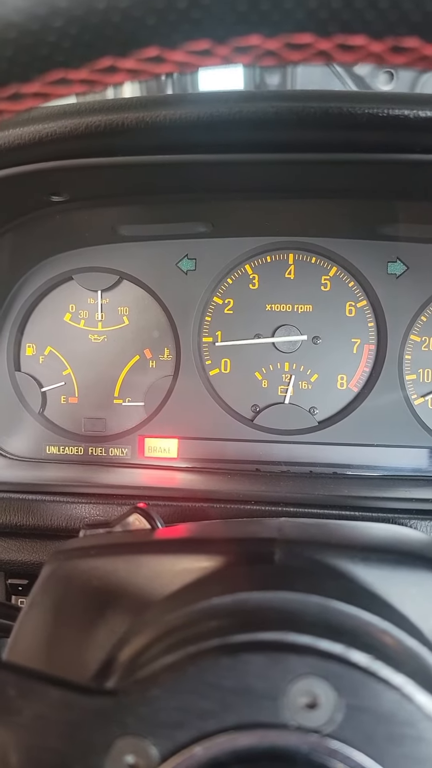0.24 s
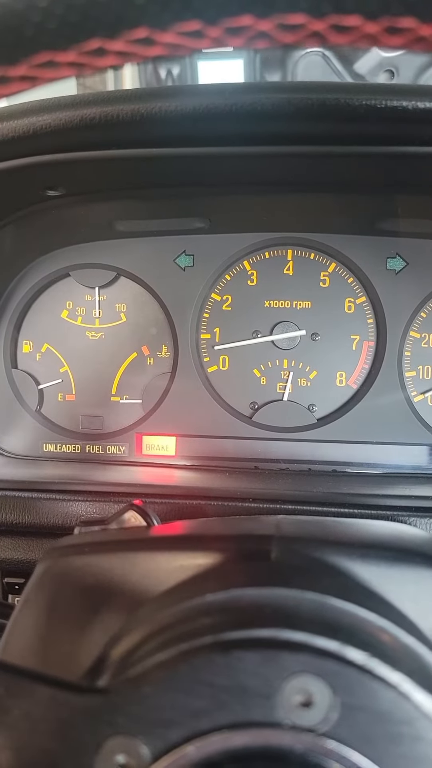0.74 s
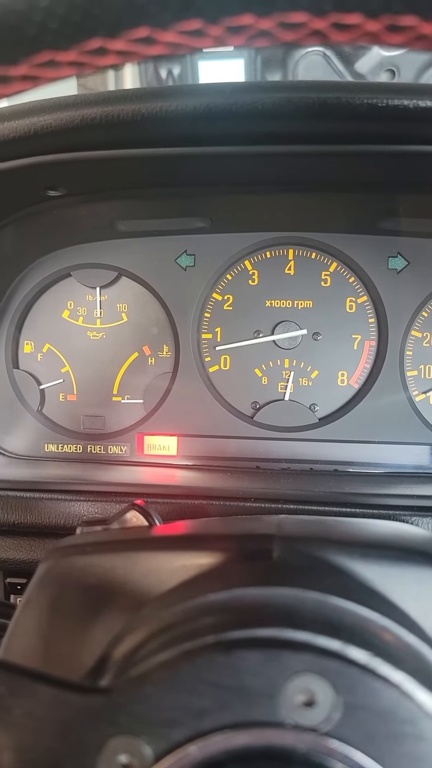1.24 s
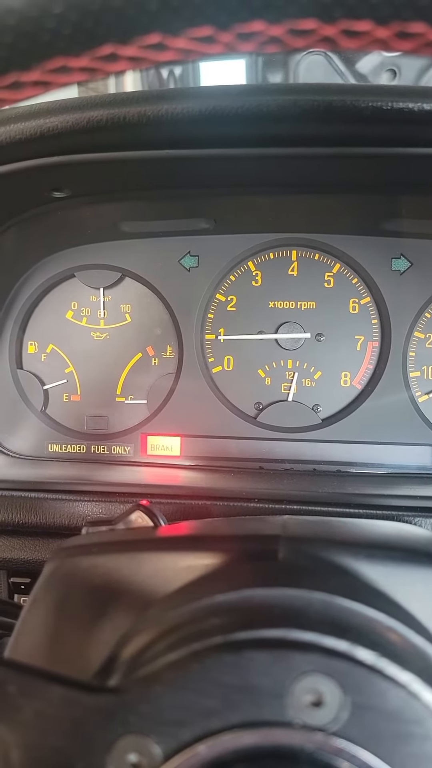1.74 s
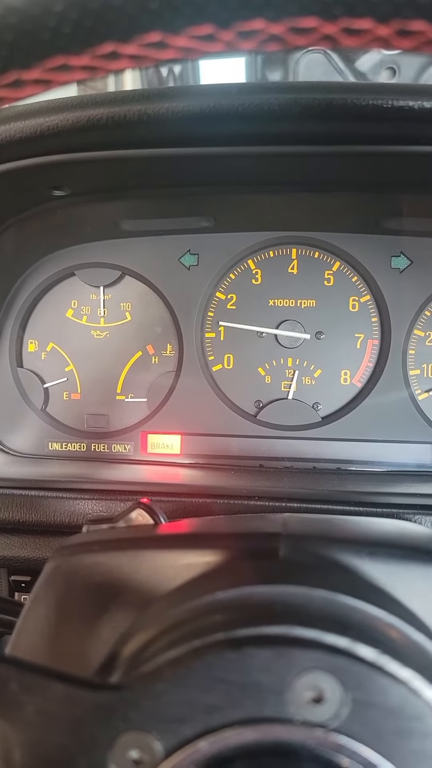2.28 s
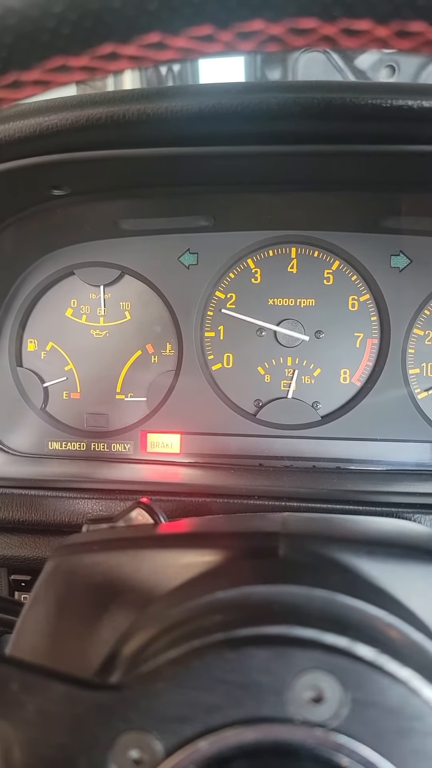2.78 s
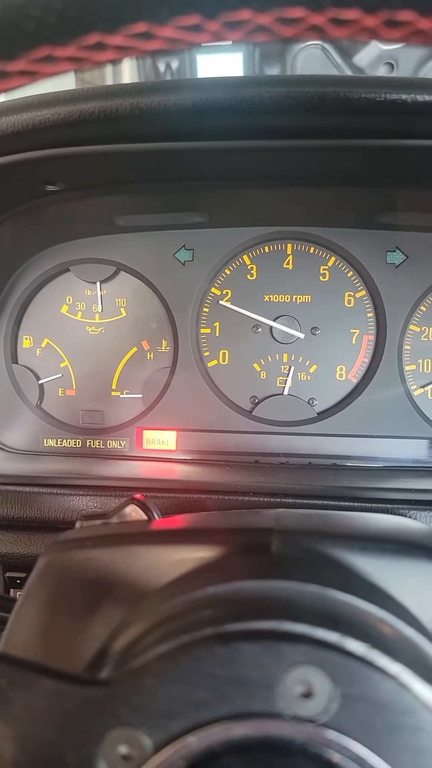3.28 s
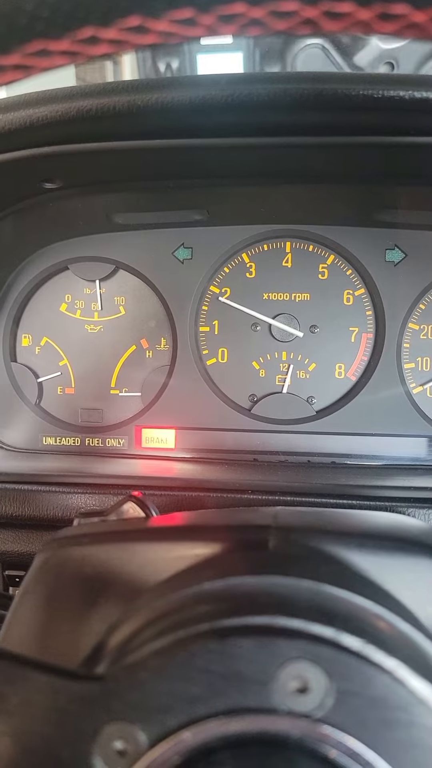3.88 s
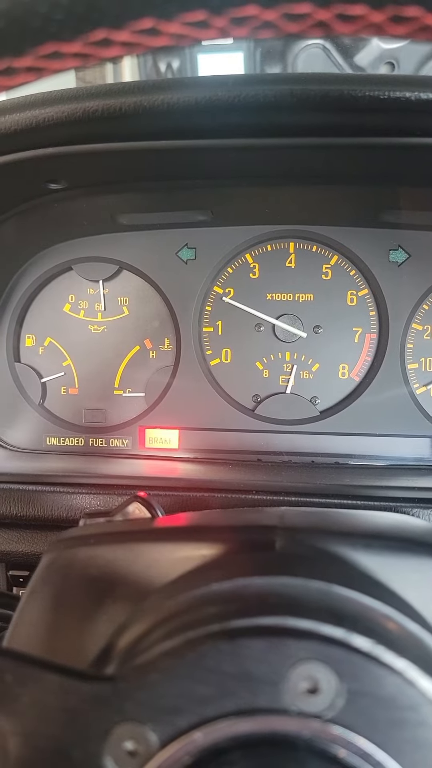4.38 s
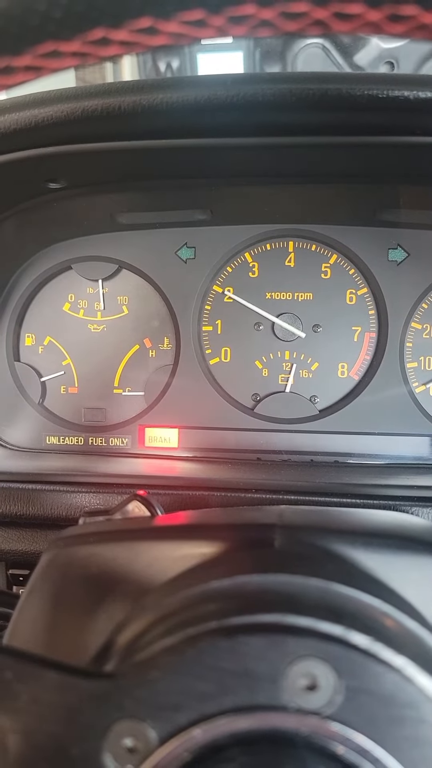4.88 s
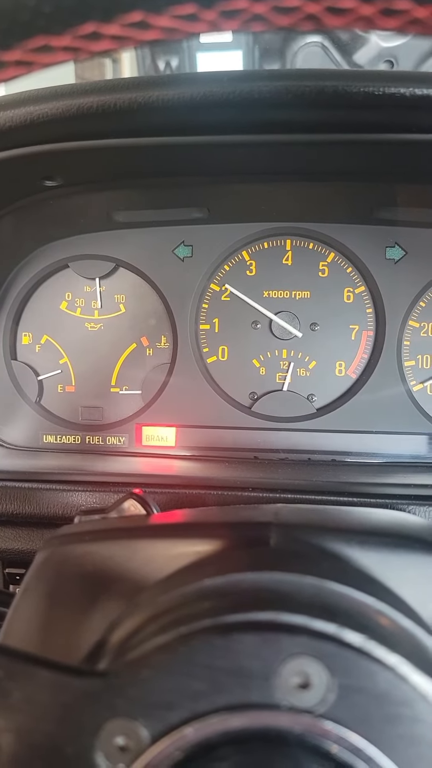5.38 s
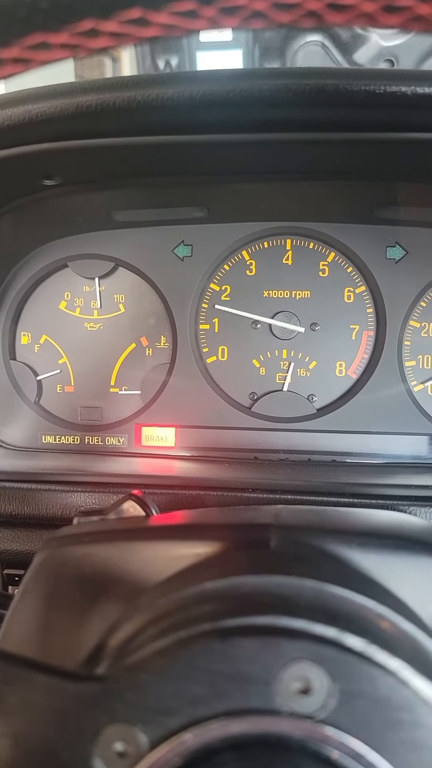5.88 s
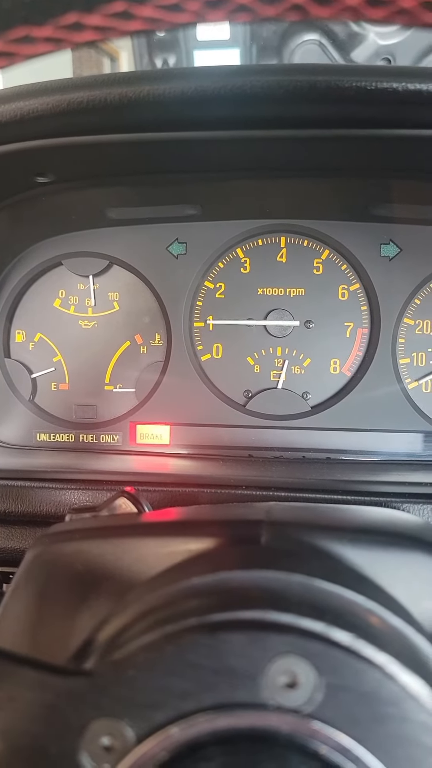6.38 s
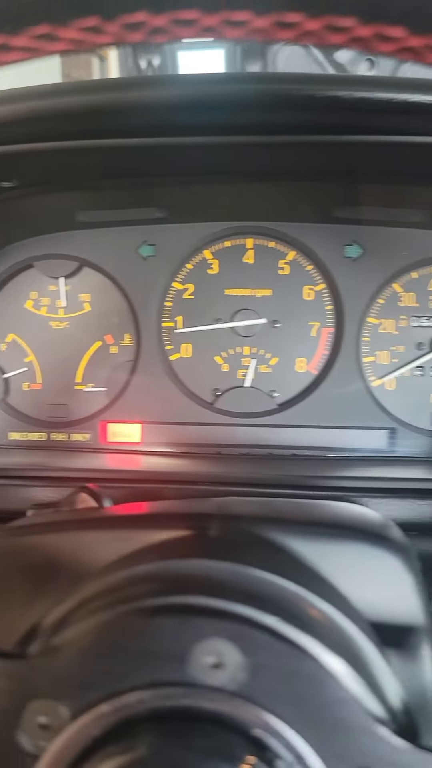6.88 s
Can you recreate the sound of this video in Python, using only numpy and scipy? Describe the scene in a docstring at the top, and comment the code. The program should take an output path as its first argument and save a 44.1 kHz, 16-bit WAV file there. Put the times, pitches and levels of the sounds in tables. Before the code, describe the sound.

From the driver's seat of a stationary car, a cold rotary engine is heard through a phone's stereo microphones. From 0 to 0.5 s the revs sag; until 1.4 s it idles low and lumpy, about 23 soft thuds a second, with a steady thin whine near 2 kHz, belt and fan murmur, and small metallic ticks and spits, sharpest near 1.45 s. At 1.5 s the throttle pushes: a plastic trim panel buzzes briefly, hiss jumps up, and thuds merge into a rising growl. From 2.3 to 4.5 s it holds a rough, booming drone with rushing gas and a faint fan tone. At 4.6 s it climbs again, peaking around 5.3 s, about a third higher. Then it drops fast, stumbling unevenly, with muffled pops around 5.8-6 s. Hiss fades, and slowing thuds and whine return until 7.1 s.

```python
"""A cold two-rotor engine heard from the driver's seat: lumpy idle, a push, a hold, then 2300 rpm and a stumbling fall.
At idle the firings part into thuds, under an intake whine, a murmur of belts and fan, and rings and spits of thin metal.
As the revs climb, each firing rings cabin, pipe and silencer, so harmonics boom and drone as they sweep through them.
Gas roars with speed and hisses with load; a trim panel buzzes on the way up and a fan tone joins in.
On the way down one rotor fires weakly, late burns thump and pop, and the thuds return."""
import sys
import numpy as np
from scipy import signal
from scipy.fft import rfft, irfft
from scipy.io import wavfile
from scipy.ndimage import uniform_filter1d

SR = 44100
rng = np.random.default_rng(int(sys.argv[2]) if len(sys.argv) > 2 else 0)


def wrap_up_sound(samples):
    """Save the sound to the file named by the first command line argument, as 16-bit audio."""
    columns = np.atleast_2d(samples).T
    # keep every value between -1 and 1, then stretch to whole-number steps
    tamed = np.clip(columns, -1, 1)
    steps = np.round(tamed * 32767).astype(np.int16)
    wavfile.write(sys.argv[1], SR, steps)


N = 314433
TIME = np.arange(N) / SR
FREQ = np.fft.rfftfreq(N, 1 / SR) + 1e-3
CRUISE_HZ = 60  # firings per second at cruising speed; octaves of speed count from here

# pieces of thin metal that gas and firings ring: pitch_hz [Hz], level_db [dB, relative]
METAL = [(4860, 4.5), (5700, 5.5), (6380, -1), (7110, 5.5), (7650, -4), (8500, 1), (9160, 0.5), (12300, -4),
         (14605, -10)]
# spectrum of hissing gas: freq_hz [Hz], density_db [dB per Hz, relative]
HISS_COLOUR = [(2060, -11.5), (3500, -4.5), (4560, -4.5), (7670, -1), (9800, -9), (10900, -7),
               (12500, -1.5), (15000, -2), (15700, -5)]


def undb(db):
    """Decibels to gain."""
    return 10 ** (np.asarray(db) / 20)


def curves(table):
    """The columns of a table, joined by straight lines in time."""
    s, *columns = np.transpose(table)
    return [np.interp(TIME, s, c) for c in columns]


def unit(x):
    """Scale to rms 1."""
    return x / np.sqrt(np.mean(x ** 2))


def steady(x, size=6001):
    """Level slow swells to rms 1 over a window of size samples; single firings keep their sizes."""
    power = np.mean(np.atleast_2d(x) ** 2, axis=0)
    power = uniform_filter1d(uniform_filter1d(power, size), size // 2)
    return x / np.sqrt(np.abs(power) + 1e-18)


def filtered(x, response):
    """Pass a sound through a frequency response."""
    return irfft(rfft(x) * response, N)


def colour(points):
    """Response through (Hz, dB) points, straight in log frequency."""
    hz, db = np.transpose(points)
    return undb(np.interp(np.log(FREQ), np.log(hz), db))


def resonance(x):
    """Steep-sided resonance: about 12 dB down at x = 1 off its centre."""
    return 1 / ((1 + 1j * x) * (1 + x ** 2) ** (3 / 2))


def modes(table, first_ms=0, step_ms=0):
    """Response of a set of resonances; delays that differ from one to the next smear a thump into a burble."""
    hz, width, db = np.transpose(table)[:, :, None]
    lag_s = (first_ms + step_ms * np.arange(len(table))[:, None]) / 1000
    ring = undb(db) * resonance((FREQ ** 2 - hz ** 2) / (FREQ * width * 2.1))
    return np.sum(ring * np.exp(-2j * np.pi * FREQ * lag_s), axis=0)


def moving_mode(x, hz, width):
    """One resonance whose centre follows a curve: shift the sound to 0 Hz, filter it, shift it back."""
    spin = np.exp(2j * np.pi * np.cumsum(hz) / SR)
    response = resonance(np.fft.fftfreq(N, 1 / SR) / width)
    return 2 * np.real(spin * np.fft.ifft(np.fft.fft(x / spin) * response))


def noise():
    """Unrelated noise at the two microphones."""
    return rng.standard_normal((2, N))


def walk(rate_hz):
    """Smooth chance with spread 1, slower than about rate_hz."""
    return unit(filtered(rng.standard_normal(N), 1 / (1 + (FREQ / rate_hz) ** 4)))


def place(x, pan_db, lead_ms=0):
    """Left is louder by pan_db and earlier by lead_ms."""
    side = np.array([[1], [-1]]) / 2
    return filtered(x, undb(side * pan_db) * np.exp(2j * np.pi * FREQ * side * lead_ms / 1000))


def swell(decay_s, rise_s):
    """A quarter-second envelope that rises to 1 and dies away."""
    age = TIME[:SR // 4]
    shape = np.exp(-age / decay_s) * (1 - np.exp(-age / rise_s))
    return shape / shape.max()


def kicks(s, db):
    """Single pulses at given times and levels."""
    return np.bincount((s * SR).astype(int), undb(db), N)[:N]


def puffs(pulses, decay_s, rise_s):
    """Flow that swells and dies away after each pulse."""
    return unit(signal.fftconvolve(pulses, swell(decay_s, rise_s))[:N])


def pings(s, db, hz):
    """Brief, rough rings of thin metal: tones shivered by chance, differently at each microphone."""
    width_hz = 55
    out, shape = np.zeros((2, N + SR)), swell(decay_s=.018, rise_s=.005)
    shiver = np.array([walk(width_hz) + 1j * walk(width_hz) for _ in range(2)])
    for start, gain, f in zip((s * SR).astype(int), undb(db), hz):
        at = start + np.arange(len(shape))
        ring = np.real(shiver[:, at % N] * np.exp(2j * np.pi * f * at / SR))
        out[:, at] += gain * shape * ring
    return out[:, :N]


def roughness(octaves, climb):
    """Uneven combustion: firings scatter more at speed, and more again while the revs fall."""
    cruising, per_octave, falling = 0.18, 0.04, 0.12  # falling: per octave a second of fall
    return cruising + per_octave * octaves + falling * np.maximum(-climb, 0)


def firing_samples(turn):
    """The sample at which each firing is due; turn counts firings."""
    return np.searchsorted(turn, np.arange(1, int(turn[-1])))


def firings(turn, rough, imbalance_db, scatter_db, jitter_ms):
    """One pulse per firing, rotors alternating; imbalance lifts one and lowers the other, roughness scatters both."""
    at = firing_samples(turn)
    late, strength = rng.standard_normal((len(at), 2)).T
    rotor = (-1) ** np.arange(len(at))
    # scatter and jitter are stated for roughness 1
    size = undb(scatter_db * rough[at] * np.minimum(strength, 1.5) + imbalance_db[at] * rotor)
    shift = jitter_ms * rough[at] * late * SR / 1000
    return np.bincount(np.clip(at + shift, 0, N - 1).astype(int), size, N)


def wander(octaves):
    """A cold engine burns unevenly: each exhaust voice swells and sinks a little, most at idle."""
    depth_db, rate_hz = 1.5, 4  # depth at idle
    return undb(depth_db * np.clip(-octaves, .5, 1) * np.clip(walk(rate_hz), -2, 1))


def loudness(law, load, octaves, climb):
    """Gain of an exhaust voice: it follows load, speed and how fast the revs rise or fall."""
    full_db, unloaded_db, octave_db, pulling_db = law
    level_db = full_db - unloaded_db * (1 - load) + octave_db * octaves + pulling_db * np.clip(climb, -1, 1)
    return wander(octaves) * undb(level_db)


def pipe_ring(push, octaves):
    """The pipe's resonances rise with speed as the gas gets hotter; each tilts with speed and has its own delay."""
    # exhaust pipe at cruising speed: pitch_hz [Hz], width_hz [Hz], level_db [dB], gain_db [dB per octave of speed]
    pipe_modes = [(112.7, 30, -11.5, 1), (146.8, 9.2, -1, -2), (192.1, 23.6, -6, 1), (208.6, 22, -2, -1),
                  (239.7, 15.5, -8, 5)]
    rise_per_octave = 0.035  # share of the pitch
    out = 0
    for k, (hz, width, db, octave_db) in enumerate(pipe_modes):
        late = np.roll(push, int((.008 * k - .004) * SR))
        ring = moving_mode(late, hz * (1 + rise_per_octave * octaves), width)
        out = out + ring * undb(db + octave_db * octaves)
    return out


def silencer_drone(push, octaves):
    """The silencer's main resonance climbs with speed as the gas gets hotter; fixed ones drone beside it."""
    # fixed resonances of the silencer: pitch_hz [Hz], width_hz [Hz], level_db [dB]
    drone_modes = [(277.7, 28.6, -6.5), (319.1, 19.9, 1), (365, 30, -18)]
    # fader of the drone: time_s [s], gain_db [dB]
    drone_gain = [(0, -28), (.45, -37), (1.3, -39.5), (2.05, -27.5), (2.3, -19), (2.5, -19), (3.1, -15),
                  (4.2, -11.5), (4.85, -16.5), (5.3, -10.5), (5.5, -24), (6.3, -30), (7.13, -38.5)]
    main_hz = 307.7 + 23.9 * octaves
    tailpipe = np.roll(push, int(.0233 * SR))
    silencer = moving_mode(tailpipe, main_hz, width=35.2)
    fixed_modes = filtered(push, modes(drone_modes, first_ms=10, step_ms=9))
    return (silencer + fixed_modes) * undb(curves(drone_gain)[0])


def exhaust(pulses, rough, load, octaves, climb, lumpy):
    """Firings and their turbulence ring cabin air, pipe and silencer; a voice swells as a harmonic sweeps through."""
    # deep and middle resonances of cabin air and exhaust: pitch_hz [Hz], width_hz [Hz], level_db [dB]
    boom_modes = [(25.7, 9.1, -14), (34.2, 5.3, 8), (45.4, 9, 0)]
    throb_modes = [(66.2, 7.1, 7), (77.7, 7.4, 4), (89.75, 4.4, 11), (99, 4.5, 0.5)]
    # loudness of each voice: level_db [dB at full load and cruising speed], unloaded_loss_db [dB at no load],
    # speed_gain_db [dB per octave of speed], pulling_gain_db [dB per octave a second of climb, up to 1 either way]
    boom_law = (-15, 18, -4.5, -3)
    throb_law = (-19, 9, -6, -1)
    pipe_law = (-13, 2, 6.5, 2)
    # fader of the pipe's ring: time_s [s], gain_db [dB]
    pipe_gain = [(.2, 4), (.65, 4.5), (1.2, -1), (1.7, 2.5), (2.08, -4.5), (2.45, -1.5), (2.8, -2),
                 (3.6, -5.5), (4.5, -2), (5.1, -3), (5.5, -5.5), (5.9, -3), (6.4, -2), (6.75, 5), (7.13, 2)]
    per_harmonic = np.sqrt(SR / (2 * CRUISE_HZ * 2 ** octaves))  # every harmonic has rms 1
    beat = per_harmonic * steady(pulses)
    turbulence = per_harmonic * rough * rng.standard_normal(N)
    boom_swell, throb_swell = thumps()

    boom = filtered(beat + 1.6 * turbulence, modes(boom_modes, first_ms=40))
    boom = boom * boom_swell * loudness(boom_law, load, octaves, climb)
    throb = filtered(beat + .8 * turbulence, modes(throb_modes, first_ms=-7, step_ms=3))
    throb = throb * throb_swell * loudness(throb_law, load, octaves, climb)
    pipe = pipe_ring(beat + 1.8 * turbulence, octaves) * loudness(pipe_law, load, octaves, climb)
    # the long rings give way to the thuds at idle
    boom = boom * undb(-10 * lumpy ** 4)
    throb = throb * undb(-20 * lumpy)
    pipe = pipe * undb(-8 * lumpy + curves(pipe_gain)[0])
    drone = silencer_drone(beat + 0.55 * turbulence, octaves)

    low = place(boom, pan_db=-2.1, lead_ms=1.5) + place(throb, pan_db=-.8, lead_ms=.35)
    return low + place(pipe, pan_db=-.1, lead_ms=.08) + place(drone, pan_db=-2.6, lead_ms=.4)


def thuds(pulses, lumpy):
    """Slow firings and late burns reach the cabin as short, separate thuds, each ringing the same body."""
    # body of one thud: pitch_hz [Hz], width_hz [Hz], level_db [dB]
    thud_modes = [(74, 44, 0), (130, 60, -4), (210, 70, -12), (325, 60, -21)]
    # strength of the thuds, before lumpiness and firing size: time_s [s], peak_db [dB]
    thud_gain = [(0, -19), (.5, -17), (.9, -14), (1.2, -11.5), (1.35, -9.5), (1.5, -7.5), (1.8, -10),
                 (6.2, -20), (6.7, -17), (7.13, -15)]
    # late burns that pop as the revs fall: start_s [s], peak_db [dB]
    pop_hits = [(5.797, -5.5), (5.825, -16), (5.88, -12), (5.972, -14)]
    body = modes(thud_modes, first_ms=2)
    body = -body / np.abs(irfft(body, N)).max()
    uneven_db = 1.5 * np.clip(walk(20), -2, 1.5)
    beats = pulses * lumpy * undb(curves(thud_gain)[0] + uneven_db)
    pops = kicks(*np.transpose(pop_hits))
    return place(filtered(beats + pops, body), pan_db=-.6, lead_ms=.2)


def roar(pulses, roar_db):
    """The sharp edge of each firing scatters round the car, and rushing gas follows it."""
    # spectrum of the roar: freq_hz [Hz], density_db [dB per Hz, relative]
    roar_colour = [(250, -1.5), (390, 8), (440, 0), (510, 5), (625, -4), (700, 1.5), (1020, -2),
                   (1130, -0.5), (1300, -3.5), (1700, -6.5), (2300, -11), (2620, -13.5), (2780, -8.5),
                   (2920, -13.5), (3370, -16), (6000, -25), (8000, -34)]
    scatter = noise()[:, :SR // 8] * np.exp(-TIME[:SR // 8] / .014)
    edge = steady(signal.fftconvolve(pulses[None], scatter)[:, :N])
    rasp = filtered(edge, 1.7 / (1 + (FREQ / 1100) ** 2))
    rush = noise() * (puffs(pulses, decay_s=0.029, rise_s=0.00033) + 2.2)
    gas = steady(filtered(rush + rasp, colour(roar_colour)))
    return place(gas * undb(roar_db), pan_db=-2.5)


def hiss(pulses, hiss_db):
    """Spurts of gas, separate at idle and merging at speed, with thin metal and throttle edge singing along."""
    # faint whistles at the edge of the throttle plate: pitch_hz [Hz], width_hz [Hz], level_db [dB]
    whistle_modes = [(12256, 20, 13), (12634, 35, 0), (15142, 20, 5)]
    # stereo balance of the hiss: freq_hz [Hz], left_minus_right_db [dB]
    hiss_balance = [(60, -1.0), (110, -0.5), (200, 6), (380, 7), (700, -8), (1290, 30), (2380, 22.5),
                    (4400, -7.5), (8120, 1), (15000, 1)]
    spurts = puffs(pulses, decay_s=0.039, rise_s=0.022)
    slack_db = hiss_db.max() - hiss_db  # how far the flow is below its strongest
    air = unit(filtered(noise(), colour(HISS_COLOUR)))
    top = filtered(air, 1 / (1 + (10500 / FREQ) ** 12))
    air = air + top * (undb(4.0 - 0.49 * slack_db) - 1)  # weak flow is duller
    whistle = unit(filtered(noise(), modes(whistle_modes))) * undb(-10 - 0.37 * slack_db)
    metal_modes = [(hz, 50, db) for hz, db in METAL]  # 50 Hz wide
    sing = unit(filtered(noise(), modes(metal_modes))) * undb(-15 + 0.32 * slack_db)
    sound = (air * undb(1.3 * walk(400)) + sing + whistle) * (spurts + 0.11)
    return place(steady(sound) * undb(hiss_db), pan_db=20 * np.log10(colour(hiss_balance)))


def whirr():
    """Belts and fan murmur through the bulkhead: coloured noise with a slight, quick waver."""
    # spectrum of the murmur: freq_hz [Hz], density_db [dB per Hz, relative]
    whirr_colour = [(250, 5.5), (400, 0.5), (500, -1.5), (640, -4.5), (770, 6.5), (850, -2.5), (984, -5),
                    (1200, -10), (1400, -3), (1700, -12.5), (2300, -13), (2800, -13.5), (4500, -24.5),
                    (7000, -36)]
    murmur = unit(filtered(noise(), colour(whirr_colour)))
    return place(murmur * undb(-36.0 + 1.36 * walk(19)), pan_db=-2.5)


def whine(turn, lumpy):
    """Air whistles in the intake with a weaker tone a fifth above, tugged by each firing; it flutters more at speed."""
    # intake whistle: time_s [s], pitch_hz [Hz], level_db [dB rms]
    whine_curve = [(0, 2040, -43), (.14, 1970, -40.5), (1.1, 1969, -37.5), (1.48, 1968, -39),
                   (1.55, 2020, -42), (1.63, 1970, -40), (1.85, 1980, -40), (2.25, 1985, -42),
                   (2.5, 1972, -43), (3.0, 1955, -45), (3.12, 1940, -35.5), (3.55, 2025, -43),
                   (3.95, 1993, -40), (4.5, 2000, -44.5), (4.7, 1963, -42), (5.6, 1972, -44),
                   (5.85, 1960, -41), (6.1, 1972, -40), (7.13, 1967, -39.5)]
    hz, db = curves(whine_curve)
    waver = 0.0028 * walk(36.0) + 0.0031 * np.sin(2 * np.pi * turn)
    half_phase = np.pi * np.cumsum(hz * (1 + waver)) / SR
    flutter_db = (.9 - .5 * lumpy) * walk(8)
    tone = np.sqrt(2) * (np.sin(2 * half_phase) + undb(-13.5) * np.sin(3 * half_phase))
    return place(tone * undb(db + 1.23 * walk(71) + flutter_db), pan_db=-4.5, lead_ms=0.14)


def tinkle(turn, load):
    """Each firing rings one piece of metal by chance, softly or clearly, and louder under load."""
    at = firing_samples(turn)
    hz, db = np.array(METAL)[rng.integers(len(METAL), size=len(at))].T
    strength, detune = rng.standard_normal((len(at), 2)).T
    level_db = -55 + db + 2 * strength - 4 * (1 - load[at])
    return pings(at / SR, level_db, hz * (1 + 0.0064 * detune))


def spits():
    """Sharp spits of gas: a short burst of hiss and the ring of thin metal that it leaves."""
    # start_s [s], level_db [dB, of the burst], ring_hz [Hz]
    spit_hits = [(.58, -48, 6700), (.665, -52, 4830), (.706, -48, 4820), (.753, -52, 7500),
                 (.845, -47, 14600), (.926, -49, 6360), (1.015, -45, 12400), (1.101, -45, 6360),
                 (1.195, -49, 4700), (1.284, -43.5, 8900), (1.33, -47, 12400), (1.371, -50, 13800),
                 (1.409, -51, 13700), (1.448, -40, 9270), (1.484, -39, 13000), (5.91, -49, 7110),
                 (6.885, -50, 4860), (7.085, -53, 8500)]
    s, db, hz = np.transpose(spit_hits)
    burst = signal.fftconvolve(kicks(s, db), swell(decay_s=0.012, rise_s=.005))[:N]
    return burst * unit(filtered(noise(), colour(HISS_COLOUR))) + pings(s, db - 5, hz)


def trim_buzz():
    """A loose plastic trim panel rattles briefly as the revs climb: bursts of noise through its modes."""
    # rattles: start_s [s], level_db [dB]
    buzz_hits = [(1.554, -32.5), (1.674, -53), (1.782, -50), (1.866, -40)]
    # modes of the panel: pitch_hz [Hz], width_hz [Hz], level_db [dB]
    panel_modes = [(1190, 130, -3), (1410, 130, 2), (1730, 150, -8), (1950, 110, -3)]
    hits = kicks(*np.transpose(buzz_hits))
    burst = signal.fftconvolve(hits, swell(decay_s=0.12, rise_s=0.0013))[:N]
    return burst * unit(filtered(noise(), modes(panel_modes)))


def fan(firing_hz, blades_per_firing=8.5, slip=0.0089):
    """The cooling fan's blade tone follows the engine: it stands out at speed, and slips on its clutch at the top."""
    # fader of the fan: time_s [s], level_db [dB rms at full speed gain]
    fan_gain = [(2.2, -53), (2.5, -38), (3.0, -41), (4.0, -32.5), (4.55, -40.5), (5.25, -33), (5.5, -38)]
    hz = firing_hz * blades_per_firing * (1 - slip * np.maximum(firing_hz - 62, 0))
    phase = 2 * np.pi * np.cumsum(hz * (1 + .011 * walk(25))) / SR
    tone = np.sqrt(2) * np.sin(phase)
    speed_gain = np.minimum(firing_hz / 52, 1) ** 6
    return place(tone * speed_gain * undb(curves(fan_gain)[0] + 2 * walk(38)), pan_db=-5.0)


def thumps():
    """Unburnt fuel after the throttle shuts: short bumps in the gains of boom and throb, some up and some down."""
    # centre_s [s], boom_gain_db [dB], throb_gain_db [dB]
    thump_hits = [(5.4, -16, 6.5), (5.62, 4, -1), (5.82, -4, 5.5), (6.05, 0, -11), (6.4, 5, 1)]
    s, boom_db, throb_db = np.transpose(thump_hits)
    half_length_s = 0.05
    bump = np.exp(-((TIME - s[:, None]) / half_length_s) ** 2)
    return undb(boom_db @ bump), undb(throb_db @ bump)


def misfire():
    """One rotor fires weakly for a moment as the revs fall: dB that one rotor gains and the other loses."""
    centre_s, half_length_s, peak_db = 5.86, 0.51, 11
    return peak_db * np.exp(-((TIME - centre_s) / half_length_s) ** 2)


def scene():
    """Engine speed and load drive the exhaust; the roar follows speed, the hiss follows load."""
    # engine speed: time_s [s], firing_rate_hz [firings per second]
    speed_curve = [(0.0, 32.34), (0.06, 31.75), (0.42, 24.36), (0.89, 22.58), (1.17, 22.52), (1.33, 22.76),
                   (1.51, 30.43), (1.71, 36.23), (2.02, 40.48), (2.36, 50.15), (2.52, 53.8), (2.74, 57.44),
                   (2.94, 59.19), (3.81, 61.85), (4.55, 62.41), (5.2, 76.07), (5.3, 76.47), (5.5, 64.72),
                   (5.6, 55.82), (5.7, 51.09), (5.94, 43.78), (6.02, 40.68), (6.61, 29.49), (7.13, 24.1)]
    # a sharp push, a hold, a second push and a release: time_s [s], load [0-1]
    load_curve = [(0, 0.1), (.5, 0.06), (1.28, 0.32), (1.56, 0.95), (1.8, 0.82), (2.28, 0.61), (2.9, 0.66),
                  (4.5, 0.67), (4.75, 0.81), (5.4, 0.77), (5.7, 0.36), (5.95, 0.35), (6.35, 0),
                  (7.13, 0.16)]
    (hz,), (load,) = curves(speed_curve), curves(load_curve)
    lumpy_hz, smooth_hz = 28.2, 40.9  # firings fully separate below, not at all above
    lumpy = np.clip((smooth_hz - hz) / (smooth_hz - lumpy_hz), 0, 1)
    turn = np.cumsum(hz) / SR + .01 * lumpy * walk(7)  # firings so far, drifting a little at idle
    octaves = np.log2(hz / CRUISE_HZ)
    climb = uniform_filter1d(np.gradient(octaves) * SR, size=8001)  # octaves a second
    rough = roughness(octaves, climb)
    imbalance_db = misfire()
    pulses = firings(turn, rough, imbalance_db, scatter_db=8, jitter_ms=.6)
    leaks = firings(turn, rough, imbalance_db / 2 + 0.49, scatter_db=19, jitter_ms=2.5)

    lows = exhaust(pulses, rough, load, octaves, climb, lumpy)
    # the strong rotor keeps its thud through the misfire, the weak one loses it
    lows = lows + thuds(pulses / undb(imbalance_db), lumpy)
    roar_db = -25 + 15.5 * octaves
    hiss_db = -32 - 21.5 * (1 - load)
    gas = roar(pulses, roar_db) + hiss(leaks, hiss_db)
    ancillaries = whirr() + whine(turn, lumpy) + fan(hz)
    return lows + gas + ancillaries + tinkle(turn, load) + spits() + trim_buzz()


def record(dry):
    """The phone cuts the deepest rumble gently and the top steeply."""
    dry = signal.sosfilt(signal.butter(2, 18, "high", fs=SR, output="sos"), dry)
    return signal.sosfilt(signal.ellip(10, .2, 80, 15750, fs=SR, output="sos"), dry)


dry = scene()
out = record(dry)
wrap_up_sound(out)
```